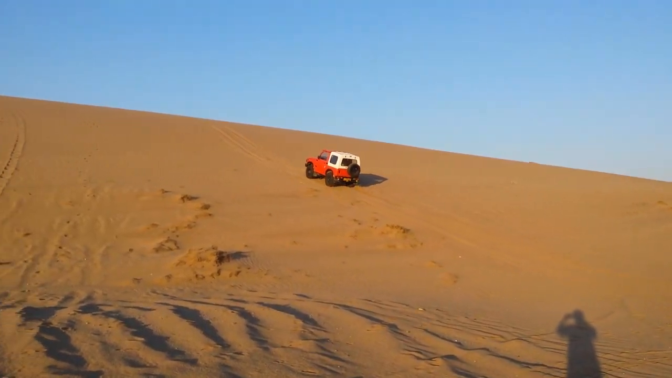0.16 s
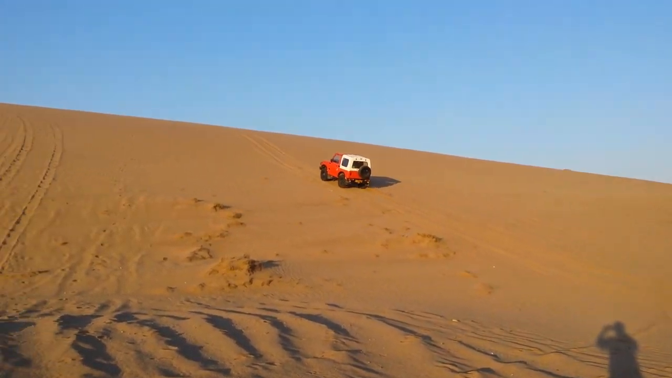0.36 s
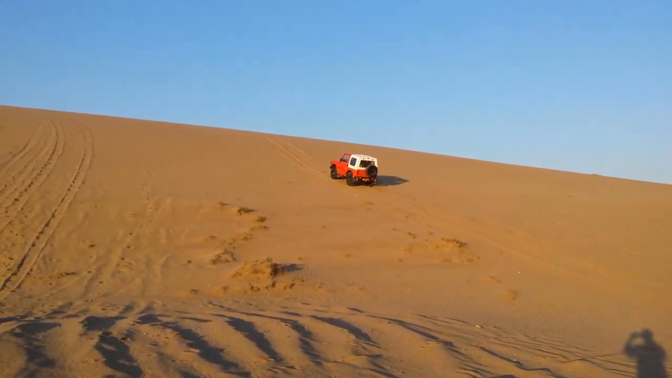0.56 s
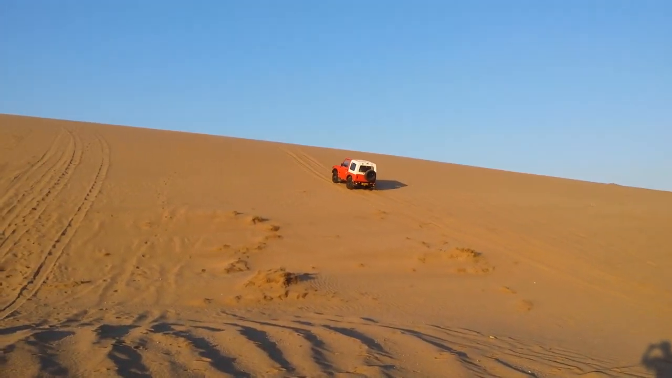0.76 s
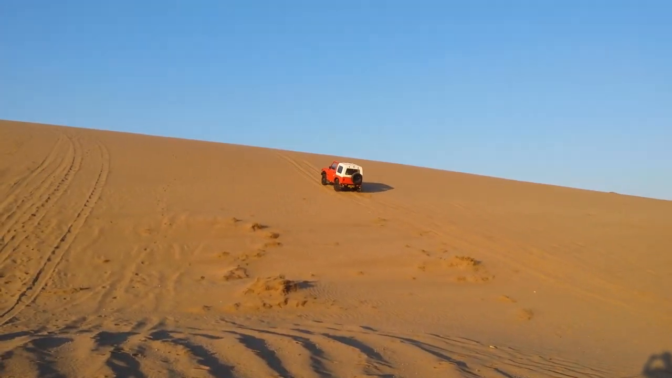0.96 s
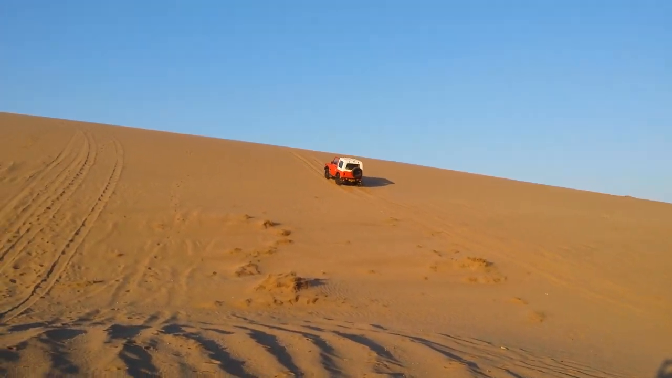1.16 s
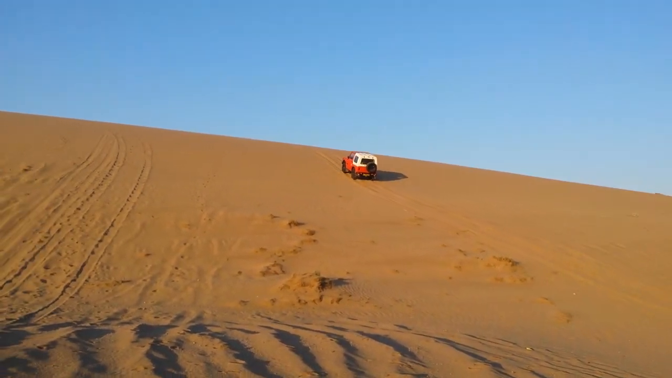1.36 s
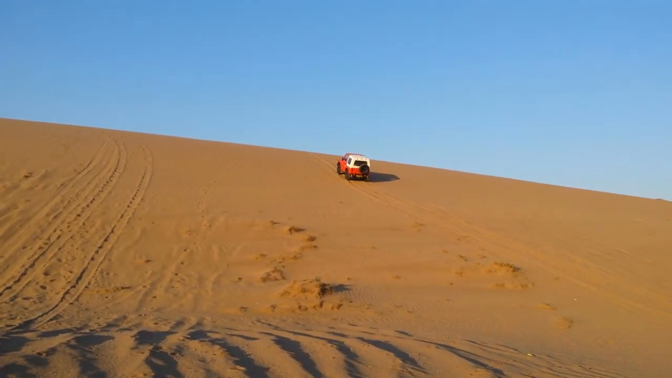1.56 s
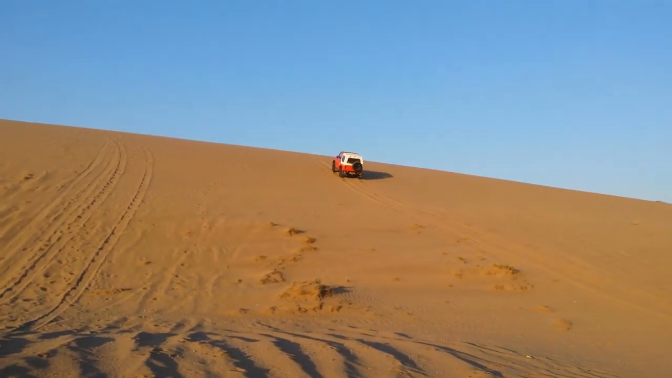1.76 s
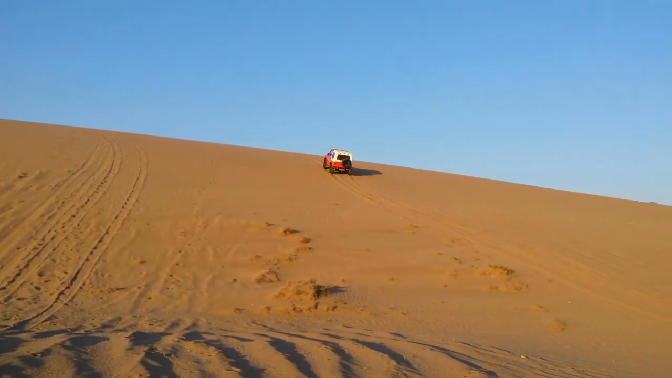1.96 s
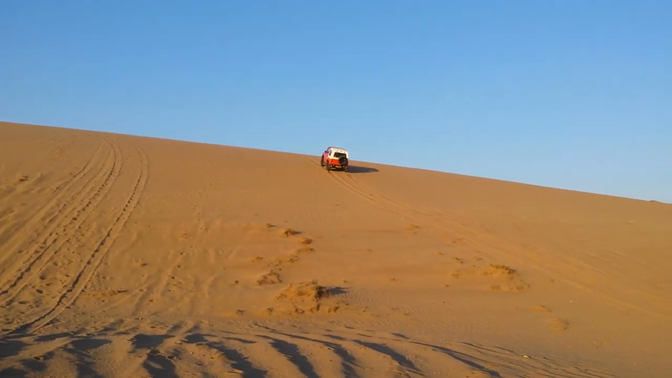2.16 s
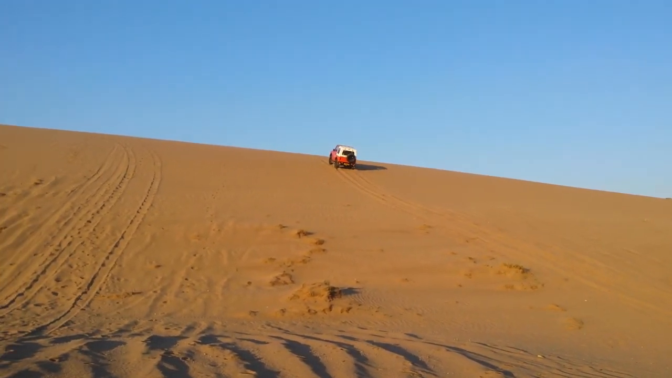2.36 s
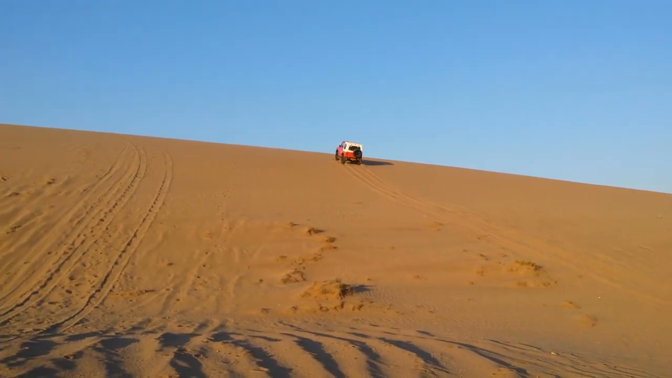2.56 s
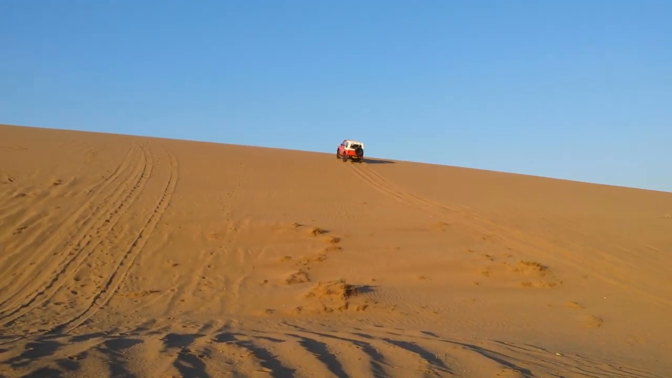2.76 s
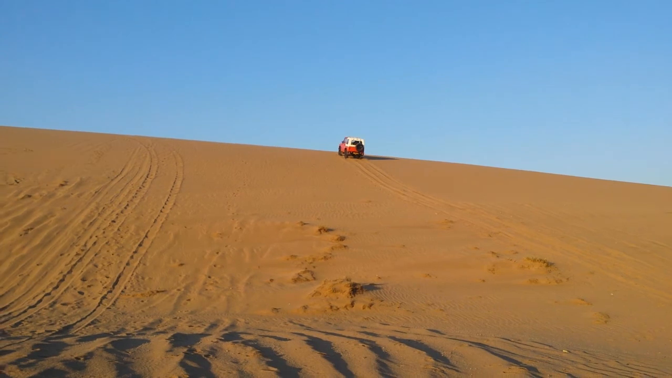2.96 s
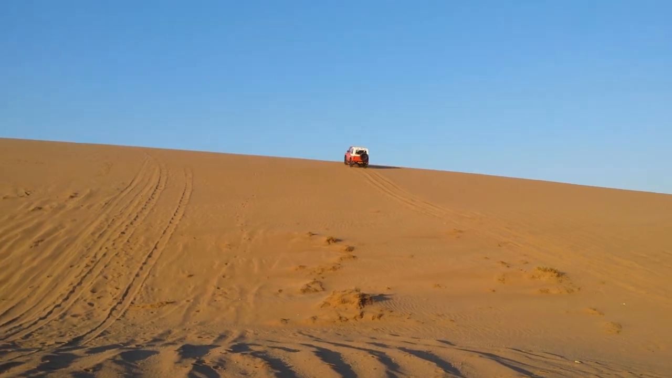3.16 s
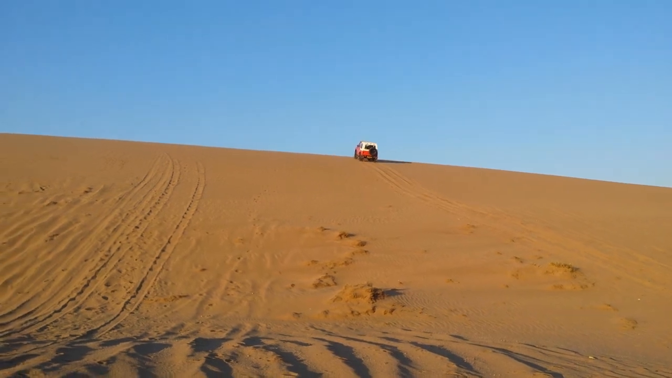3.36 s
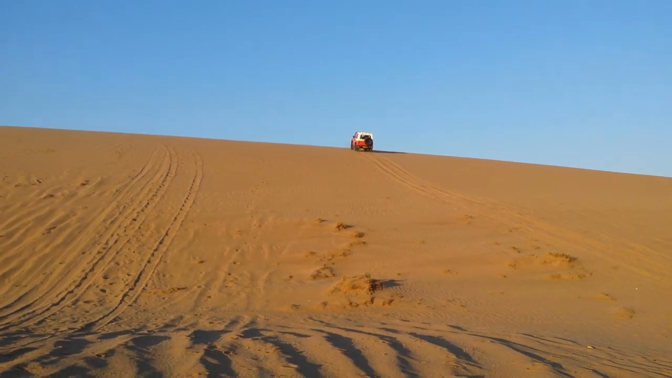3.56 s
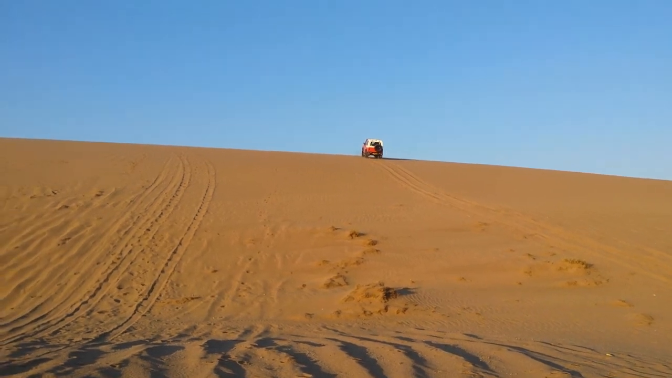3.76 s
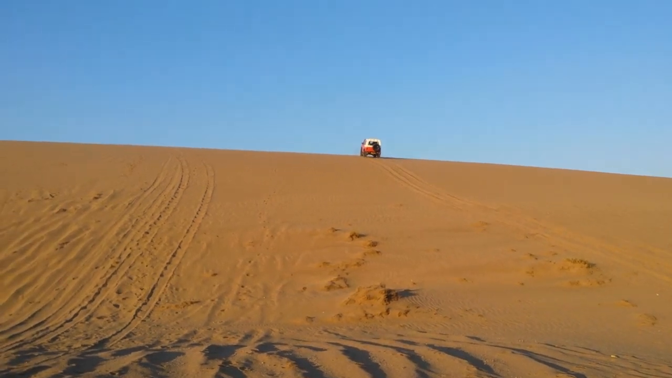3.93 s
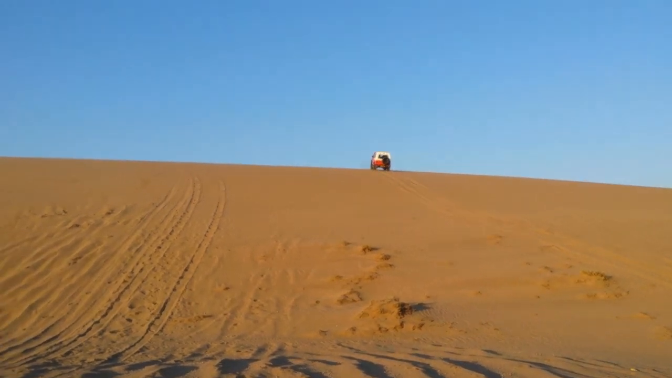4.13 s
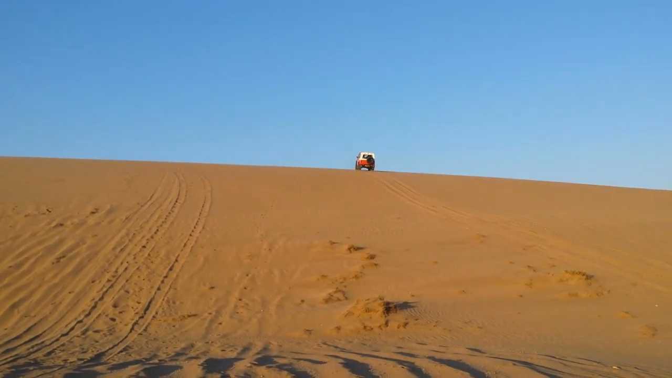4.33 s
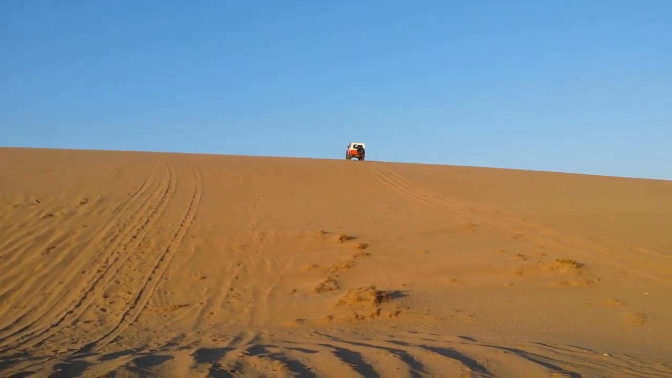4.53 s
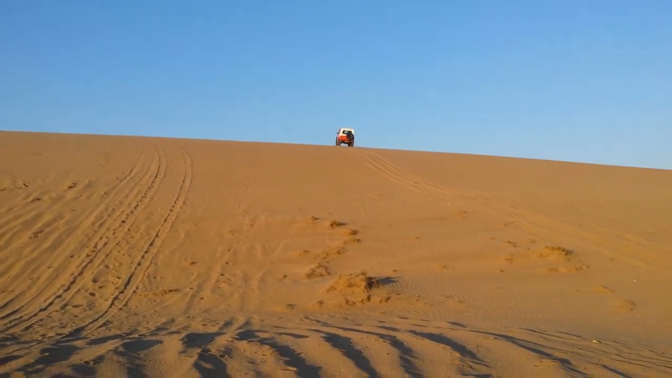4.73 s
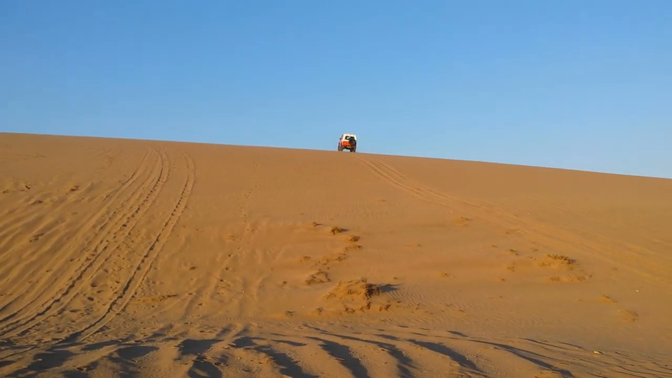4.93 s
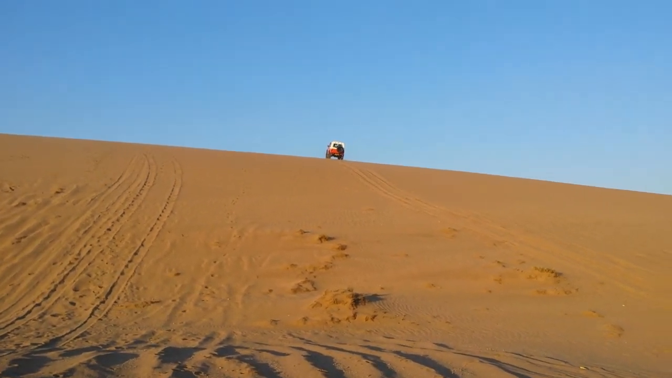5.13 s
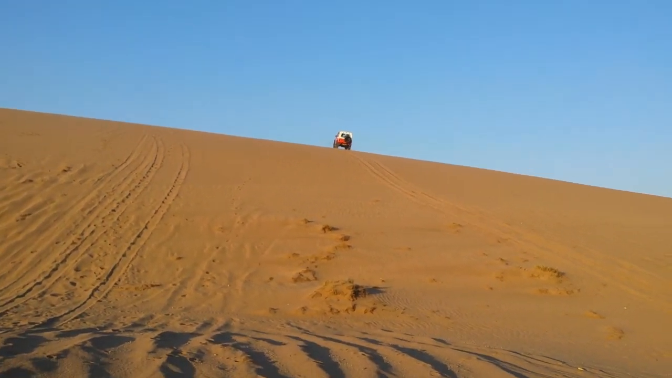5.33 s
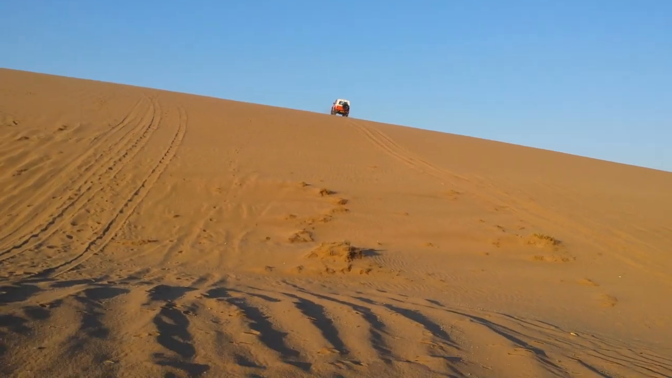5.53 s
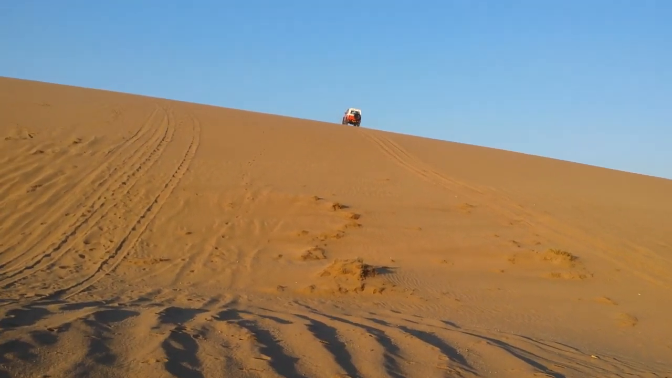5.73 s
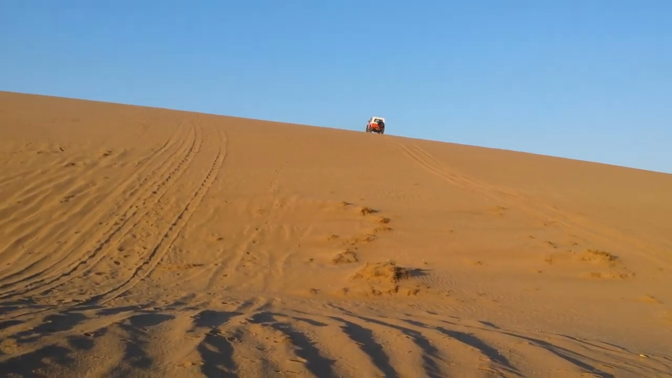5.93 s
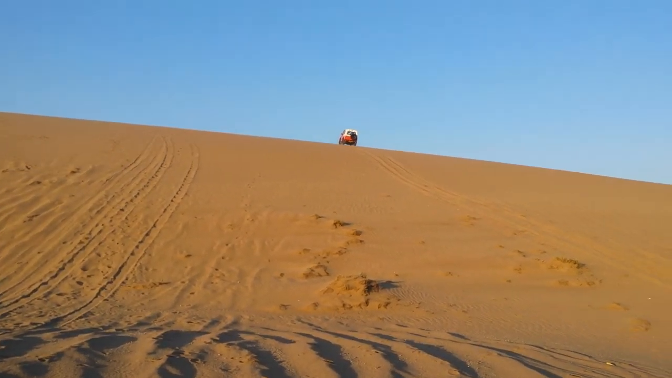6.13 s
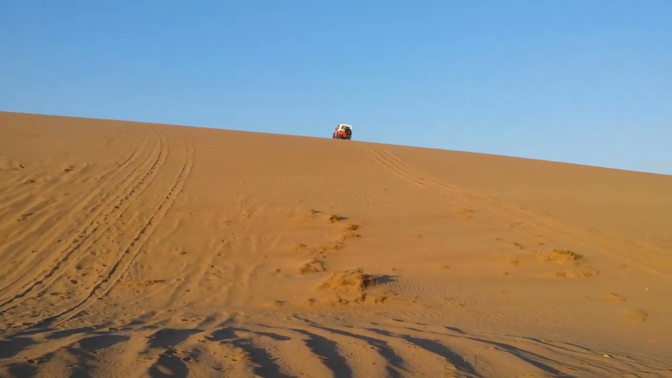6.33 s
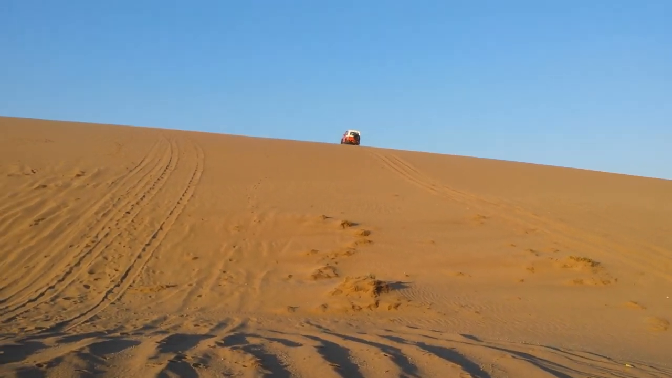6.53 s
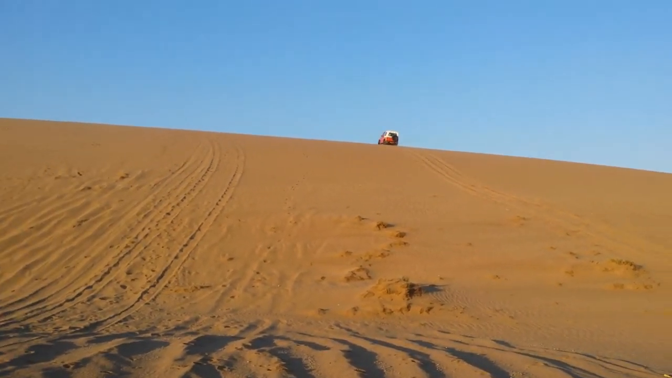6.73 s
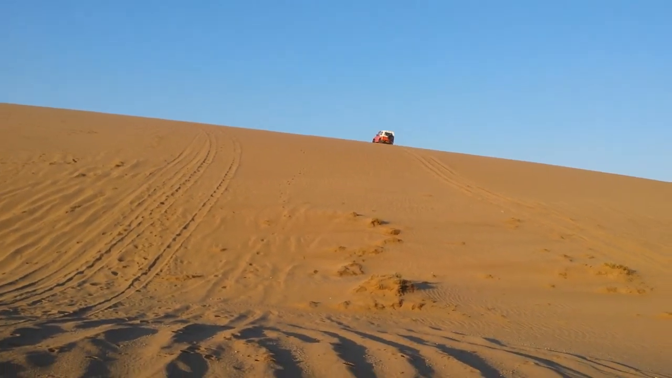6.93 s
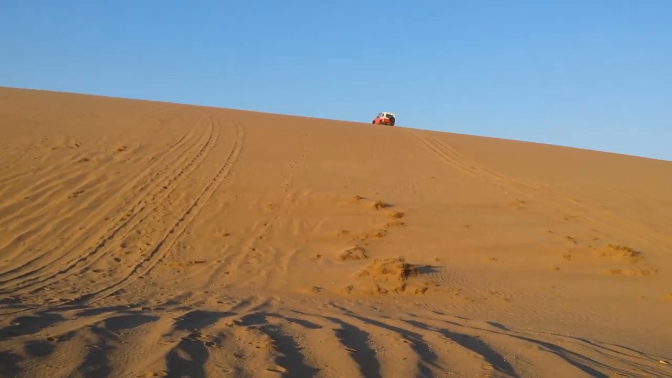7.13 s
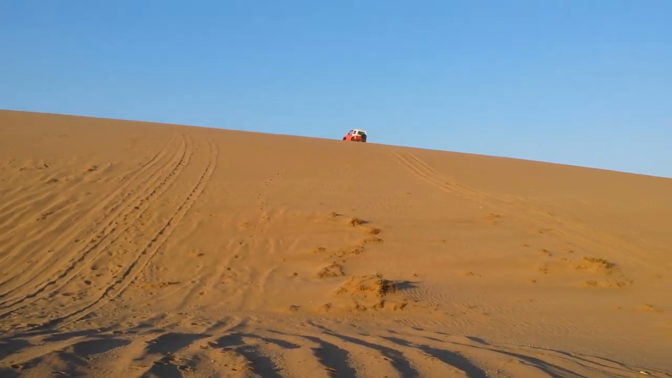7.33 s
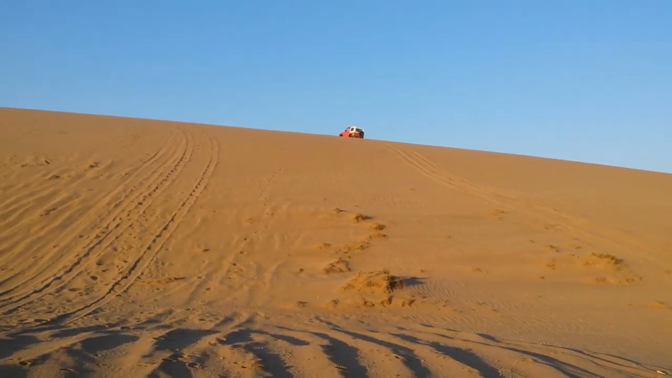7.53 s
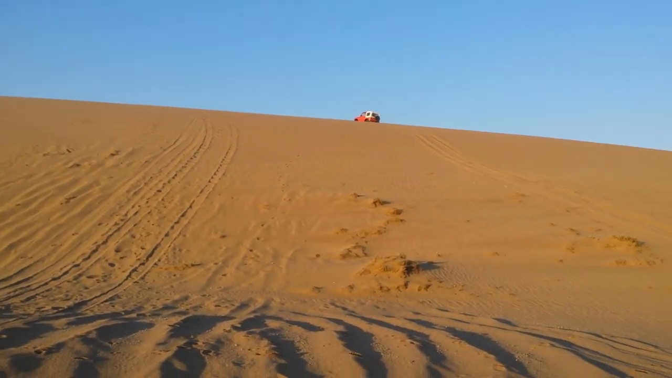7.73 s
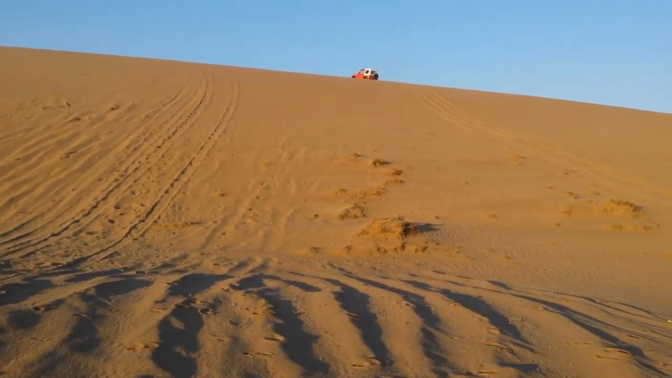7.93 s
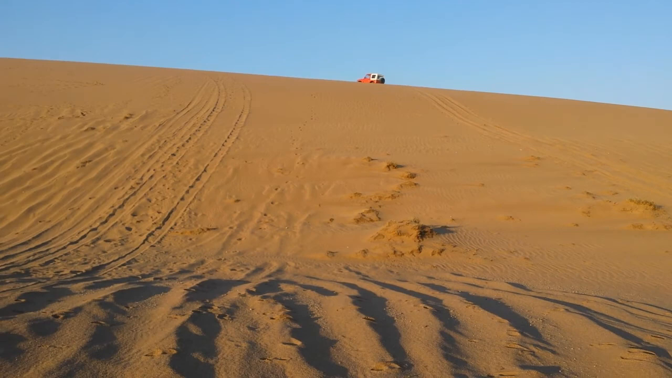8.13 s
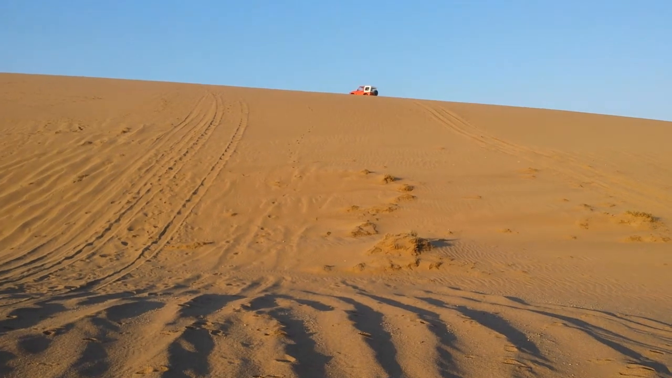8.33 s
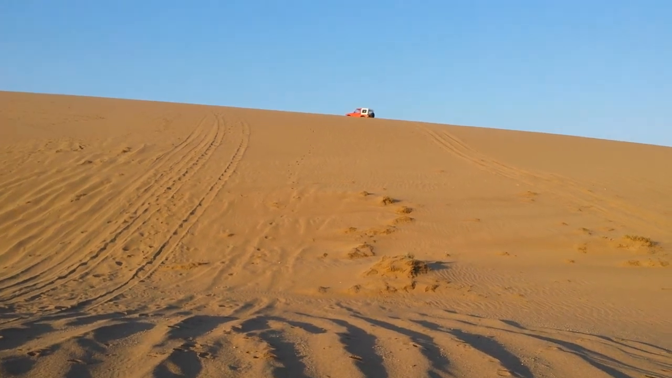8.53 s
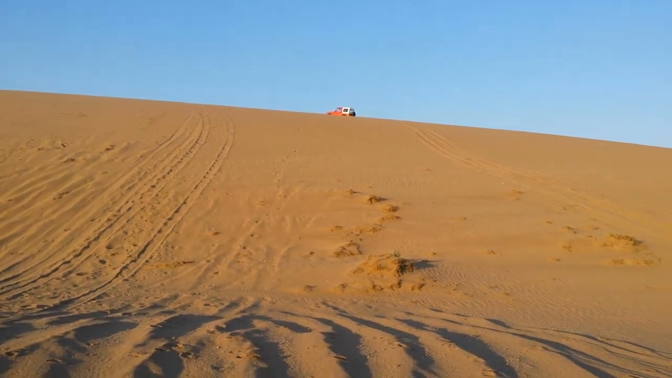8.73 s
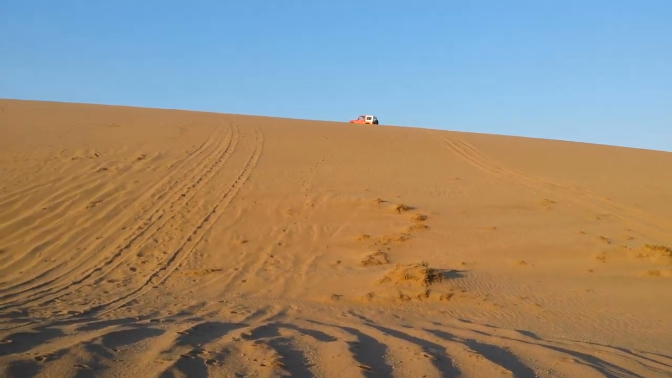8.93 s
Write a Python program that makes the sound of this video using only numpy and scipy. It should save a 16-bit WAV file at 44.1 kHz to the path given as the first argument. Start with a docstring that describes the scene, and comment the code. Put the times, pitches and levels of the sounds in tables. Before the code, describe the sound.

At 0 s a small four-cylinder off-roader is already revving fairly high, a loping hum and raspy exhaust, driving away up open sand. Its pitch sinks steadily to about 2.8 s as it labours; the tailpipe bark strengthens around 1.3-2.7 s and the rasp turns keen, with spitting hiss. Small dry ticks sound close by at 1.0-1.4 s. At about 2.9 and 3.15 s the throttle lifts briefly, two quick dips, then revs jump at 3.4 s and peak near 4.1 s. From 4 to 5.3 s the crest dulls it and revs sag, lowest before a small raspy pull at 6.5 s. It then fades to a faint low drone by 9 s. Nearby, sand shuffles at 4.9, 5.7, 6.6, 7.4 and 8.5 s, with clicks, tiny high squeaks, quiet breeze and soft low buffets, stronger on the left.

```python
"""Off-roader on a sand dune

A small four-cylinder off-roader climbs a dune, lifts off twice, revs up again and fades over the crest.
Harmonics of the firing rate hum and boom, and side tones make them lope; two tailpipe resonances bark.
Noise chopped by the firings makes a rasp and puffs of hiss that echo off the sand.
Close by, shaped noise makes shuffling feet, ticks and a light breeze; noisy sines make faint squeaks."""
import sys
import numpy as np
from scipy import signal
from scipy.fft import rfft, irfft, next_fast_len
from scipy.io import wavfile
from scipy.ndimage import map_coordinates

SR = 44100
rng = np.random.default_rng(int(sys.argv[2]) if len(sys.argv) > 2 else 0)


def wav_out(sig):
    """Save sig, one row per channel (or a flat mono array), as 16-bit PCM at SR to the path in sys.argv[1]."""
    wavfile.write(sys.argv[1], SR, np.round(np.clip(np.atleast_2d(sig).T, -1, 1) * 32767).astype(np.int16))


N = 396459
TIME = np.arange(N) / SR  # s

# engine speed: t/s, firing rate/Hz
SPEED = [(0, 127.6), (.3, 121.4), (.75, 114), (.92, 112), (1.06, 112.3), (1.6, 102.3), (1.9, 99.5),
         (2.05, 99.7), (2.57, 95.8), (2.85, 95.3), (2.98, 83.5), (3.13, 96.6), (3.24, 89.4), (3.42, 120.5),
         (3.58, 117.6), (3.93, 120.7), (4.11, 131.4), (4.31, 117.7), (4.47, 121), (4.78, 106.8), (5.2, 104),
         (5.41, 100), (5.65, 96.3), (5.9, 90), (6.2, 83.6), (6.6, 92), (7.1, 86.4), (7.35, 90.6),
         (7.67, 86), (7.84, 85), (8.24, 82.6), (8.42, 78), (8.77, 77.6), (8.99, 77)]


def car():
    """One crankshaft, turning a little unsteadily, drives every part of the engine's sound."""
    # how raggedly the cylinders fire: t/s, raggedness 0-1
    raggedness = [(0, .7), (.8, 0.45), (1.25, .13), (3.35, 0.34), (3.6, 0.41), (4.5, 0.29), (4.85, 0.32),
                  (6.1, .4), (6.4, .17), (8.99, .25)]
    firing_hz, = curves(SPEED)
    sputter, = curves(raggedness)
    # share of the gas that comes in puffs; ragged firing and the crest smooth it out
    puffed = 0.94 - 0.84 * sputter - 0.35 * behind_crest()
    speed_hz = firing_hz * (1 + 0.00259 * drift(23.4))
    cycle = np.cumsum(speed_hz) / SR / 4  # four-stroke cycles so far, four firings in each
    tones = drone(cycle)
    pipes = bark(cycle, sputter, sputter, puffs(cycle, puffed))
    return tones + pipes + gas(cycle, puffed)


def drone(cycle):
    """Four firings a cycle give hum, boom and overtones; unequal cylinders add side tones that throb."""
    # first and third firing harmonics, foot down: t/s, hum level/dB, third level/dB
    harmonics = [(0, -23, -33.5), (.75, -25, -27), (1.4, -26.5, -28.5), (2, -27.5, -37), (3.9, -25, -39),
                 (4.6, -35.5, -40), (4.85, -40, -59), (6.1, -40, -58), (6.5, -33.5, -43), (7.2, -43.5, -56),
                 (8.99, -38, -60)]
    # the exhaust booms most at low revs: f/Hz, gain/dB
    boom_response = [(150, -3), (175, 4), (192, -0.73), (210, -4.5), (222, -5), (242, -9), (260, -14)]
    # side tones ahead of the silencer: multiple of the cycle rate, level against the lope/dB
    side_tones = [(2, -30.5), (3, -27.5), (5, -32), (6, -13.5), (7, -0.5), (9, -9.5), (10, -15.5),
                  (11, -11), (13, -20.5), (14, -24), (15, -26)]
    # the silencer cancels a narrow band: f/Hz, gain/dB
    silencer = [(225, 2), (250, -2.5), (275, -11), (305, -9), (330, -4), (380, 1.5), (450, -4)]
    # low turbulence under the hum: f/Hz, level/dB
    rumble_spectrum = [(20, -6), (45, -1.5), (80, 1), (140, 6.5), (220, 15.5), (330, -14), (450, -12.5),
                       (800, -28.5)]
    # second harmonic, side tones, fourth harmonic: level/dB, throttle slope/(dB per dB),
    # speed slope/(dB per octave), driving away/(dB per s), behind the crest/dB, off the throttle/dB
    boom_part = (-3.9, 1.1, 0, -2.85, -.4, -20)
    lope_part = (-25.5, 0.57, 21.5, -3.0, -2, 3.5)
    fourth_part = (-51.5, 2, -4, 0.93, -4, -15)

    firing = 4 * cycle
    off = lifted()
    hum_db, third_db = curves(harmonics) + np.outer([-10.5, -20], off)  # dB lost off the throttle
    lope_db, fourth_db = level_db(lope_part), level_db(fourth_part)
    boom_db = level_db(boom_part) + read(boom_response, 2 * curves(SPEED)[0])

    hum = gain_of(hum_db + 0.88 * drift(20)) * np.cos(2 * np.pi * firing)
    boom_wander_db = (0.59 + 5 * off) * drift(37)  # off the throttle the engine fires unsteadily
    boom = gain_of(boom_db + boom_wander_db) * np.sin(2 * np.pi * 2 * firing)
    overtones = 0
    for k, db in enumerate((third_db, fourth_db), 3):
        overtones = overtones + gain_of(db + 1.4 * drift(12)) * np.cos(2 * np.pi * k * firing)
    sides = 0
    for k, db in side_tones:
        tone = np.cos(2 * np.pi * (k * cycle + rng.random()))
        sides = sides + gain_of(db + 1.6 * drift(7.6)) * tone
    sides = filtered(sides, lambda f: gain_of(read(silencer, f)))
    rumble = gain_of(hum_db - 11.5) * coloured(port_noise(), rumble_spectrum)
    return np.sqrt(2) * (hum + boom + overtones + gain_of(lope_db) * sides) + rumble


def bark(cycle, uneven, rough, flow):
    """Firing pulses and turbulence ring two tailpipe resonances, which swell as a harmonic sweeps through."""
    # the two resonances: f/Hz, level/dB
    lower_pipe = [(290, -31.5), (380, -5.5), (440, -6), (490, 1.5), (540, 10), (600, 2.5), (660, 1),
                  (730, -44.5)]
    upper_pipe = [(590, -35), (670, -3), (730, 10), (770, -1), (830, -13.5), (920, -36.5), (1080, -32),
                  (1300, -31.5)]
    # their levels, foot down: t/s, lower level/dB, upper level/dB
    pipe_levels = [(0, -42.5, -41.5), (.6, -45.5, -32.5), (1.3, -34.5, -25.5), (1.9, -29.5, -29),
                   (2.7, -30.5, -34.5), (3.1, -33.5, -37), (3.38, -29.5, -31.5), (4.1, -29, -40),
                   (5.3, -46, -47), (6.1, -44.5, -52), (6.45, -38.5, -47), (7.05, -57, -43.5),
                   (7.33, -53.5, -57), (8.99, -50.5, -63)]
    pulses = np.zeros(N)
    for k in range(8, 60):  # harmonics of the cycle; every fourth is a firing harmonic
        between = k % 4 != 0
        size = uneven * gain_of(1.8 * drift(9)) if between else 1
        phase = between * rng.uniform(0, 2 * np.pi)
        pulses += size * np.cos(2 * np.pi * k * (cycle - 1 / 8) + phase)
    turbulence = flow * rng.standard_normal(N)
    rough = np.clip(rough, 0, 1)
    lift_db = -14 * lifted()
    out = 0
    for pipe, pipe_db in zip((lower_pipe, upper_pipe), curves(pipe_levels)):
        ring = (1 - rough) * coloured(pulses, pipe) + rough * coloured(turbulence, pipe)
        out = out + gain_of(pipe_db + lift_db) * ring
    return out


def gas(cycle, puffed):
    """Escaping exhaust: a rasp and a sharper hiss, chopped by the firings, every other puff stronger."""
    # spectra of the coarse rasp, the keen rasp and the hiss: f/Hz, level/dB
    coarse_rasp = [(300, -21), (450, -3), (800, 3), (930, -2.5), (1100, 1), (1400, -1), (1750, -4.5),
                   (2250, -5), (2550, -9.5), (2900, -9.5), (3200, -30), (4500, -37.5)]
    keen_rasp = [(500, -12.5), (800, -10), (1000, -1), (1300, -3), (1900, -6.5), (2300, 0), (2600, -11),
                 (2950, -10.5), (3200, -21), (4500, -24.5)]
    hiss_spectrum = [(2800, -48), (3200, -21), (3550, -10.5), (4000, -8.5), (4500, -2), (5200, 1.5),
                     (6300, -2), (7200, -4.5), (8000, -20), (9000, -26.5), (11000, -24), (15500, -41.5)]
    # rasp and hiss: level/dB, throttle slope/(dB per dB), speed slope/(dB per octave),
    # driving away/(dB per s), behind the crest/dB, off the throttle/dB
    rasp_part = (-37, 0, 16, -1.66, -5.5, -7.5)
    hiss_part = (-44, 0.71, 25.5, -0.71, -10, -4)
    # the escaping gas flares up: t/s, half length/s, rasp gain/dB, hiss gain/dB
    flares = [(0.094, 0.22, 2, -1.5), (1.026, .07, 0.5, 2), (1.3, 0.27, 0, 6), (1.661, 0.14, -1, 4),
              (2.42, 0.14, 1.5, 6.5), (2.78, .16, 5.5, 3.5), (3.063, 0.061, 2.5, 10), (3.386, 0.13, 0, 5),
              (4.481, .18, 1, 5.5), (6.499, 0.22, 7.5, 5)]
    rasp_db, hiss_db = level_db(rasp_part), level_db(hiss_part)
    for s, half, rasp_gain_db, hiss_gain_db in flares:
        flare = swell(s, half, half)
        rasp_db = rasp_db + rasp_gain_db * flare
        hiss_db = hiss_db + hiss_gain_db * flare

    # labouring at low revs, the rasp turns keen
    keen_below_hz, keen_full_hz = 118, 92  # firing rate
    labouring = np.clip((keen_below_hz - curves(SPEED)[0]) / (keen_below_hz - keen_full_hz), 0, 1)
    keen = labouring * (1 - behind_crest())

    limp = gain_of(0.65 * np.sin(2 * np.pi * 2 * cycle))  # one swing per two firings
    flow = limp * jet(cycle, 0.33 * puffed) * puffs(cycle, 0.42 * puffed, width=0.093)
    spit = limp * jet(cycle, 0.12 * puffed) * puffs(cycle, 1.005 * puffed, width=0.13)
    rasp = (1 - keen) * coloured(flow, coarse_rasp) + keen * coloured(flow, keen_rasp)
    hiss = coloured(spit, hiss_spectrum)
    return sand_echo(gain_of(rasp_db) * rasp + gain_of(hiss_db) * hiss)


def puffs(cycle, share, width=0.32, scatter_db=4.5):
    """Gas flow: a burst as each exhaust valve opens, of random strength, over a steady stream."""
    firing = 4 * cycle
    burst = np.exp(-((firing % 1 - .5) / width) ** 2)  # width in firing periods
    strength = gain_of(scatter_db * rng.uniform(-1.5, 1.5, 2000))[firing.astype(int)]
    share = np.clip(share, 0, 1)
    return np.sqrt(1 - share + share * evened(burst * strength) ** 2)


def jet(cycle, buzz):
    """Turbulence, of which the share buzz repeats from firing to firing and changes shape only slowly."""
    shapes = rng.standard_normal((40, 360))  # successive shapes, points per firing
    age = TIME * 3  # three new shapes a second
    angle = (4 * cycle % 1) * shapes.shape[1]
    repeating = evened(map_coordinates(shapes, [age, angle], order=3, mode="grid-wrap"))
    buzz = np.clip(buzz, 0, 1)
    return np.sqrt(buzz) * repeating + np.sqrt(1 - buzz) * port_noise()


def sand_echo(x):
    """The slope returns the sound late; the delay grows to a limit as the car climbs, and jiggles as it bounces."""
    steady_s = np.minimum(.0009 + .00019 * TIME, .00161)
    delay_s = steady_s * (1 + .012 * drift(8))
    strength = .32
    echoed = [c + strength * map_coordinates(c, [(TIME - delay_s) * SR], order=3) for c in x]
    return np.array(echoed) / np.hypot(1, strength)


def level_db(part):
    """One part's level follows throttle and speed, and falls or rises with distance, crest and lift-off."""
    # how hard the engine pulls: t/s, throttle/dB
    throttle = [(0, -4.5), (.92, -4), (1.05, -1.6), (1.5, -0.5), (2.85, -0.3), (3.03, -3.5), (3.38, 0),
                (4.1, -5), (4.6, -5), (4.9, 0.9), (5.5, -3.5), (5.9, -8), (6.2, -8), (6.5, 0.2), (7.33, -5),
                (8.2, -3.5), (8.99, -8.5)]
    db, per_throttle, per_octave, per_s, crest_db, lift_db = part
    octaves = np.log2(curves(SPEED)[0] / 100)  # against 100 firings per second
    pull_db = per_throttle * curves(throttle)[0] + per_octave * octaves
    away_db = per_s * TIME + crest_db * behind_crest()
    return db + pull_db + away_db + lift_db * lifted()


def lifted():
    """How far the foot is off the throttle, 0-1."""
    # the foot comes off the throttle: t/s, length/s, depth 0-1
    lifts = [(2.872, 0.12, 1), (3.141, 0.13, .85)]
    pedal_s = .017  # time the throttle takes to shut or open
    step = lambda s: np.tanh((TIME - s) / pedal_s)
    return sum(depth * (step(s) - step(s + length)) / 2 for s, length, depth in lifts)


def behind_crest():
    """How far the dune hides the car, 0-1."""
    start_s, end_s = 3.99, 5.33
    return np.clip((TIME - start_s) / (end_s - start_s), 0, 1)


def shuffles():
    """Sand gives way underfoot in clumps of tiny grains, then trickles to rest."""
    # foot movements: peak t/s, rise/s, fall/s, level/dB
    steps = [(4.856, 0.016, 0.0078, -43.5), (5.665, 0.048, 0.037, -48.5), (5.82, 0.079, 0.07, -46),
             (6.5, 0.099, 0.1, -53.5), (6.66, 0.053, 0.067, -53.5), (6.75, 0.035, 0.019, -54.5),
             (7.395, 0.023, 0.039, -47.5), (7.475, 0.031, 0.022, -49), (7.58, 0.065, 0.067, -57.5),
             (8.539, 0.025, 0.036, -45)]
    # the grains' spectrum: f/Hz, level/dB
    sand = [(400, -6), (900, 0.5), (1300, 5), (2200, 3.5), (2800, 1), (3400, -5), (4200, -0.5), (5400, 1),
            (7000, -6), (8000, -5.5), (11000, -20), (15000, -28)]
    pressure = 0
    for s, rise, fall, db in steps:
        trickle = 0.17 * swell(s, rise, 3 * fall)
        pressure = pressure + gain_of(db) * (swell(s, rise, fall) + trickle)
    grains = port_noise() * gain_of(1.7 * drift(500))
    return pressure * coloured(grains, sand)


def ticks(decay_s=0.0014):
    """Short, dry, bright clicks close by: noise in sharp bumps."""
    # the clicks: t/s, level/dB
    clicks = [(1.05, -46), (1.158, -38), (1.301, -45), (1.42, -52), (4.855, -42), (5.32, -44), (5.631, -41),
              (7.61, -51), (8.39, -57)]
    strikes = sum(gain_of(db) * swell(s, decay_s / 2, decay_s) for s, db in clicks)
    return strikes * coloured(port_noise(), [(3000, -20), (6000, 8), (12000, -6.5), (15500, -15)])


def breeze():
    """A quiet wash of air, with low buffets that strike each port separately, the left one harder."""
    # spectrum of the wash: f/Hz, level/dB
    air = [(20, -12), (60, 15.5), (120, 12.5), (280, -6), (400, 6), (700, -2), (900, -16.5), (1120, -9),
           (1600, -19), (2300, -20.5), (3200, -21.5), (4000, -17), (5000, -17.5), (7000, -16),
           (8800, -23.5), (12000, -22.5), (15500, -19.5)]
    # soft buffets ahead of the port trim: t/s, half length/s, level/dB
    buffets = [(2.931, 0.059, -35.5), (3.215, 0.054, -42), (4.674, 0.053, -32), (7.836, .05, -42),
               (8.257, 0.073, -38), (8.526, 0.052, -31.5), (8.83, 0.049, -38)]
    sway = gain_of(.5 * drift(3))
    wash = gain_of(-45) * coloured(port_noise(), air) * sway
    gusts = gain_of(-52) + sum(gain_of(db) * swell(s, half, half) for s, half, db in buffets)
    eddy_spectrum = [(22, -5), (50, 4.5), (85, 11.0), (150, 7), (400, -36)]
    eddies = coloured(rng.standard_normal((2, N)), eddy_spectrum)
    return wash + gusts * eddies * gain_of([[3], [-5]])  # left, right


def squeaks(width_hz=300):
    """Thin, breathy high tones that come and go: sines multiplied by slow noise."""
    # the squeaks: t/s, half length/s, f/Hz, level/dB
    tones = [(4.55, 0.07, 7900, -66), (5.126, 0.066, 8000, -57), (5.241, 0.085, 8100, -62),
             (7.73, 0.049, 6597, -67), (7.84, .04, 6800, -69), (7.941, 0.054, 7340, -63),
             (8.401, 0.049, 6690, -61), (8.618, 0.052, 7515, -64)]
    out = 0
    for s, half, hz, db in tones:
        breathy = drift(width_hz) * np.sqrt(2) * np.sin(2 * np.pi * hz * TIME)
        out = out + gain_of(db) * swell(s, half, half) * breathy
    return out


def port_noise():
    """White noise at two microphone ports, alike by an amount that depends on frequency."""
    # shared part of the noise: f/Hz, likeness 0-1
    likeness = [(30, 0.68), (130, 0.86), (700, 0.97), (1400, 0.93), (3100, 0.9), (5500, 1), (7500, 0.25),
                (10000, .25), (15000, .15)]
    a, b = rng.standard_normal((2, N))
    same = lambda f: np.clip(read(likeness, f), 0, 1)
    other = lambda f: np.sqrt(1 - same(f) ** 2)
    return np.array([a, filtered(a, same) + filtered(b, other)])


def drift(rate_hz):
    """Slow random wander of rms one."""
    return evened(filtered(rng.standard_normal(N), lambda f: np.exp(-(f / rate_hz) ** 2)))


def swell(s, rise, fall):
    """A smooth bump in time that peaks at s."""
    return np.exp(-np.minimum(((TIME - s) / np.where(TIME < s, rise, fall)) ** 2, 50))


def coloured(x, spectrum):
    """Gives x a spectrum that falls off steeply beyond its ends; rms one."""
    low_hz, high_hz = spectrum[0][0], spectrum[-1][0]

    def response(f):
        ends = np.minimum(f / low_hz, 1) ** 2 / np.maximum(f / high_hz, 1) ** 2
        return gain_of(read(spectrum, f)) * ends

    return evened(filtered(x, response))


def filtered(x, response):
    """Filters by a response given as a function of frequency."""
    size = next_fast_len(N + 4096, True)
    return irfft(rfft(x, size) * response(np.fft.rfftfreq(size, 1 / SR)), size)[..., :N]


def read(points, hz):
    """A spectrum joined by straight lines on a log-frequency axis."""
    f, value = np.transpose(points)
    return np.interp(np.log(hz + 1), np.log(f + 1), value)


def curves(rows):
    """Every column of a table, joined by straight lines in time."""
    s, *columns = np.transpose(rows)
    return [np.interp(TIME, s, c) for c in columns]


def evened(x):
    """Scales to an rms of one."""
    return x / np.sqrt(np.mean(x ** 2) + 1e-20)


def gain_of(db):
    """Decibels to amplitude."""
    return 10 ** (np.asarray(db) / 20)


def scene():
    """The car on the dune, and the small sounds near by."""
    return car() + shuffles() + ticks() + breeze() + squeaks()


def record(dry):
    """The two ports differ in level and phase; then a steep low-pass limits the band."""
    # left minus right: f/Hz, level/dB
    balance = [(60, -1.7), (200, -2.5), (400, -2), (1200, -1.4), (2400, -4), (4400, 1), (8100, -12.5),
               (15000, -3)]
    # phase by which left leads: f/Hz, lead/rad
    lead = [(100, 0.13), (2000, -0.11), (4000, -1.53), (5600, -0.89), (7000, -1.6), (9000, -0.45)]
    edge_hz = 15600
    side = np.array([[.5], [-.5]])  # each port takes half the difference
    tilt = lambda f: gain_of(side * read(balance, f)) * np.exp(1j * side * read(lead, f))
    ports = filtered(dry, tilt)
    low_pass = signal.firwin(511, edge_hz, window=("kaiser", 9), fs=SR)
    return signal.oaconvolve(ports, low_pass[None], "same")


dry = scene()
out = record(dry)
wav_out(out)
```